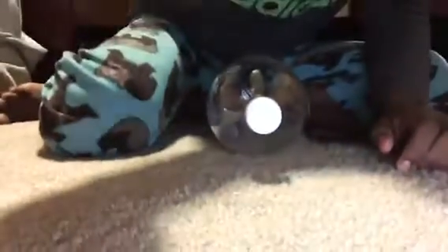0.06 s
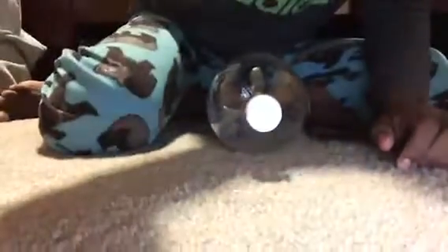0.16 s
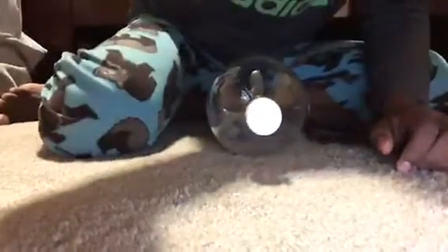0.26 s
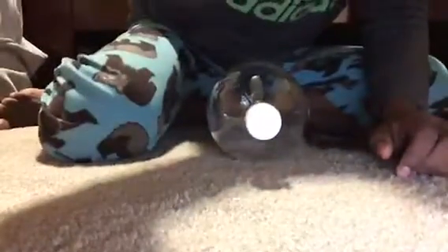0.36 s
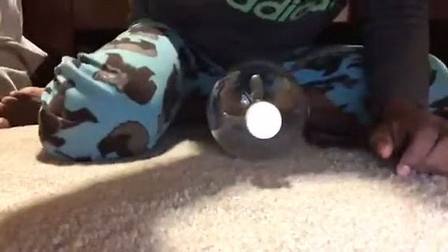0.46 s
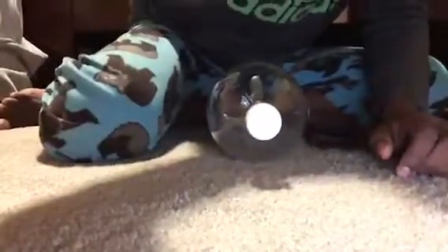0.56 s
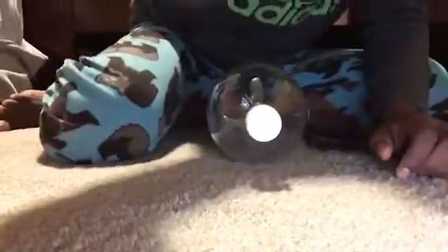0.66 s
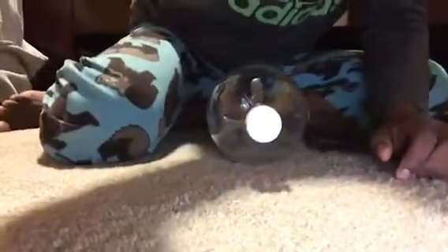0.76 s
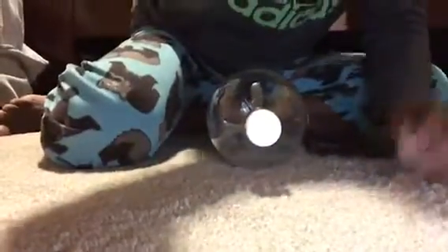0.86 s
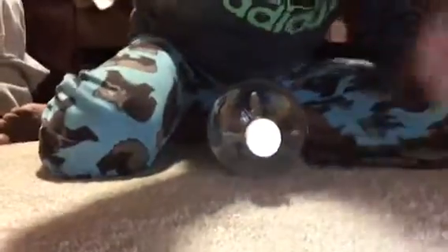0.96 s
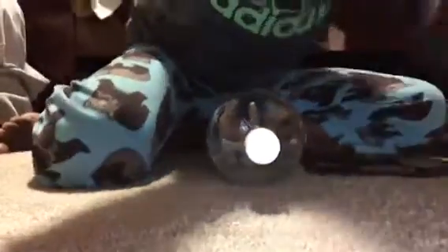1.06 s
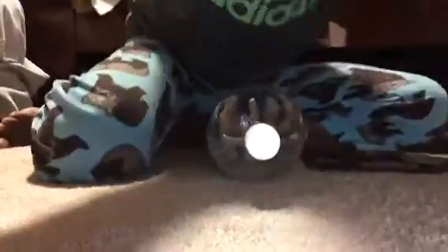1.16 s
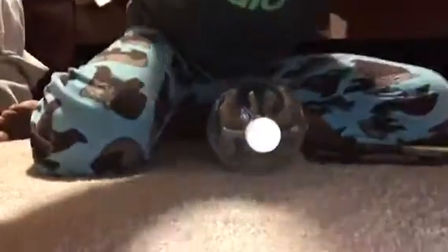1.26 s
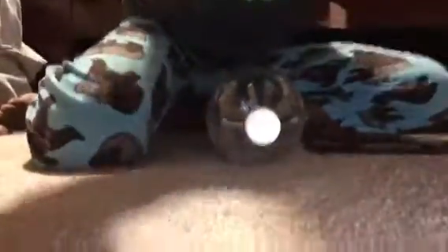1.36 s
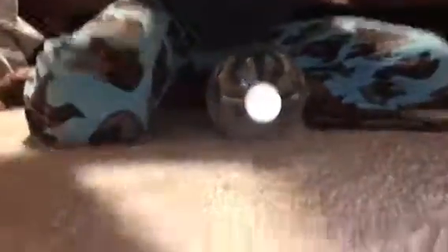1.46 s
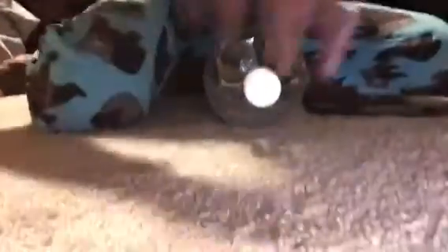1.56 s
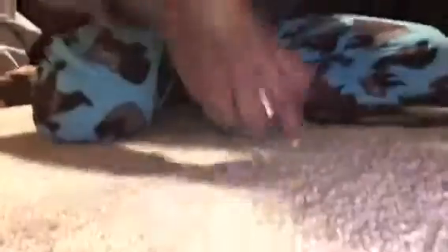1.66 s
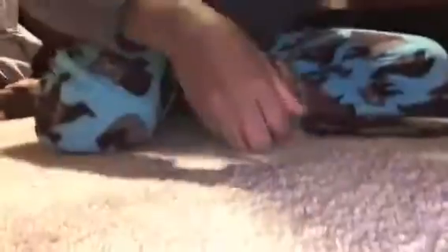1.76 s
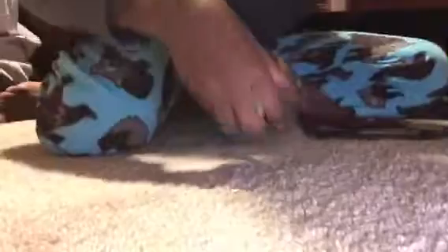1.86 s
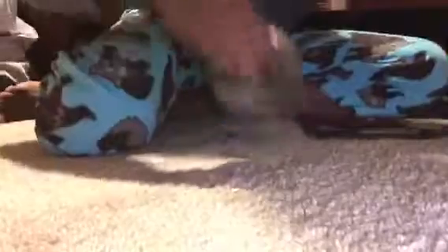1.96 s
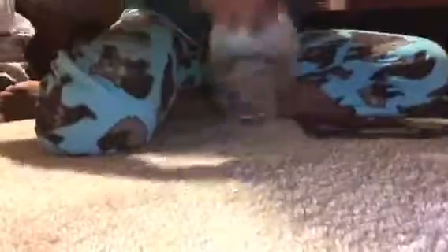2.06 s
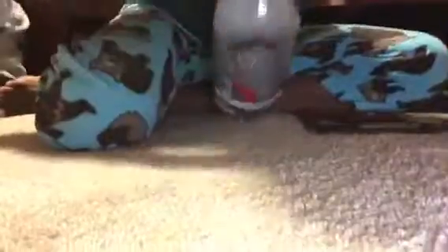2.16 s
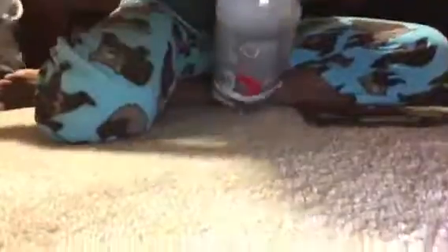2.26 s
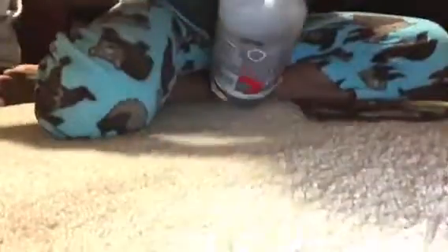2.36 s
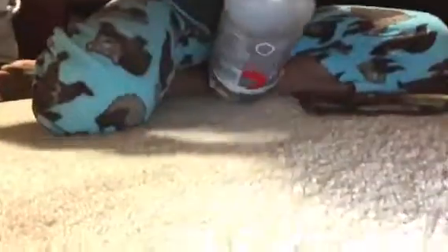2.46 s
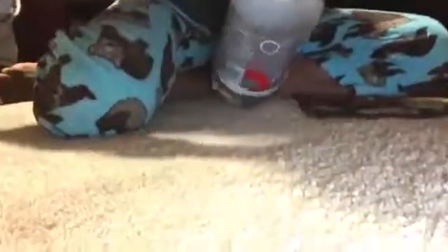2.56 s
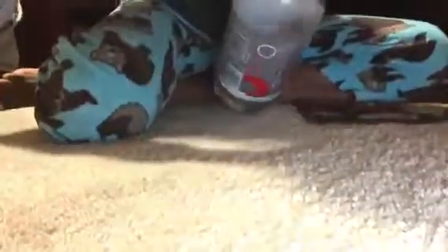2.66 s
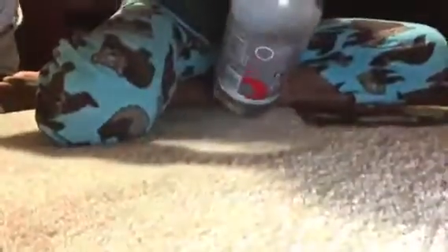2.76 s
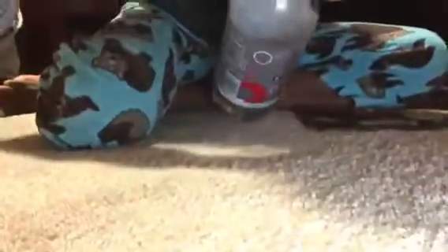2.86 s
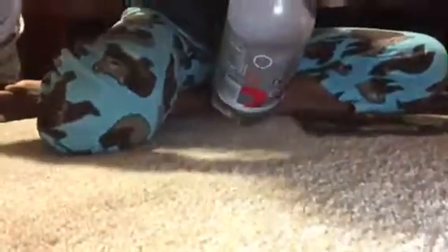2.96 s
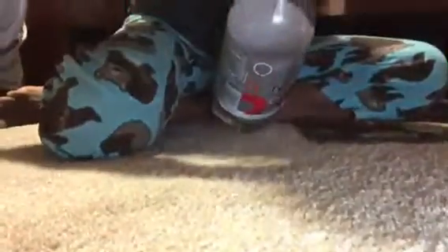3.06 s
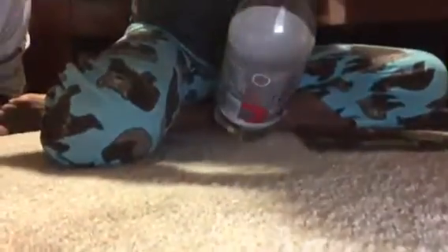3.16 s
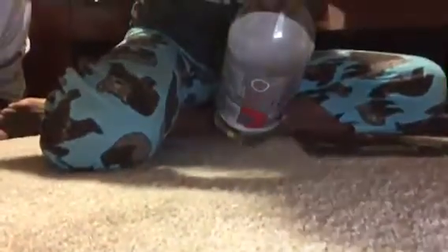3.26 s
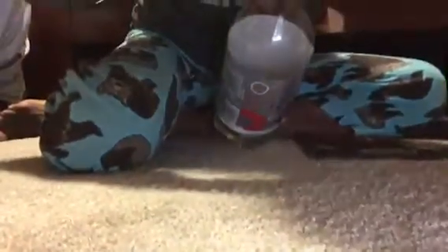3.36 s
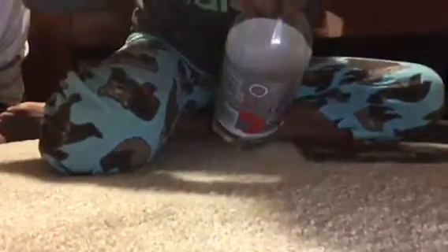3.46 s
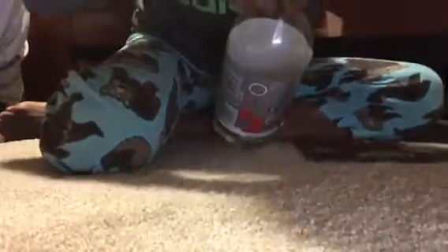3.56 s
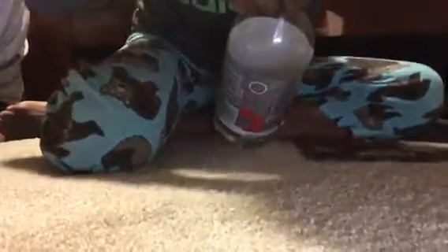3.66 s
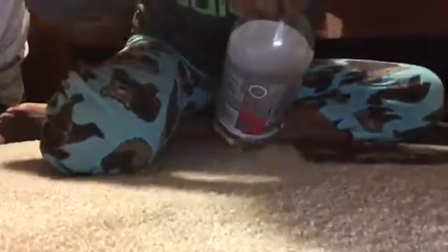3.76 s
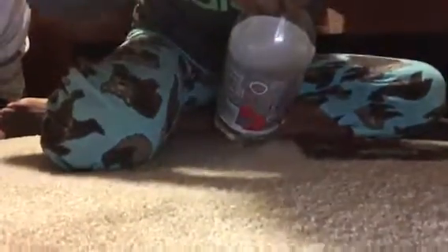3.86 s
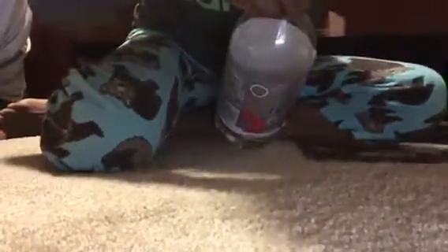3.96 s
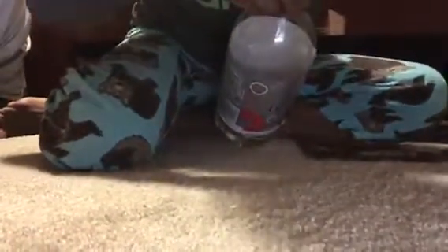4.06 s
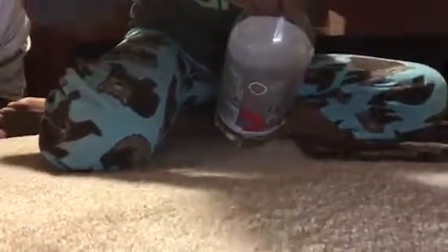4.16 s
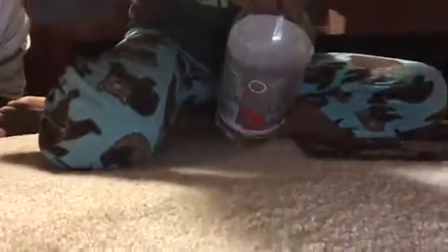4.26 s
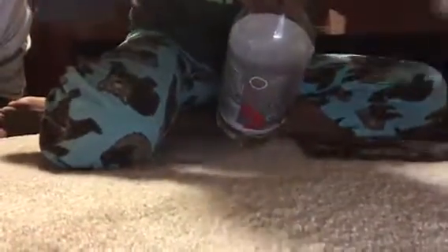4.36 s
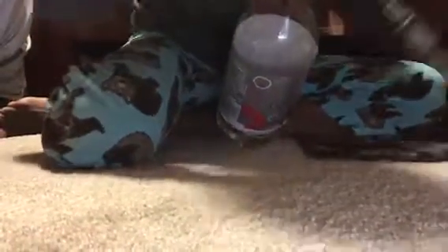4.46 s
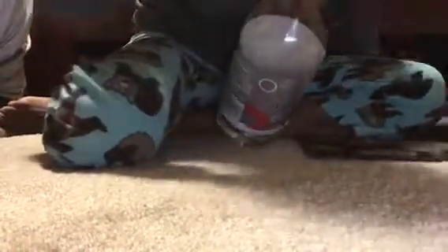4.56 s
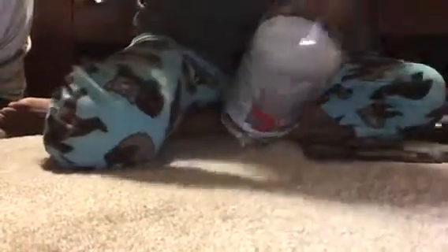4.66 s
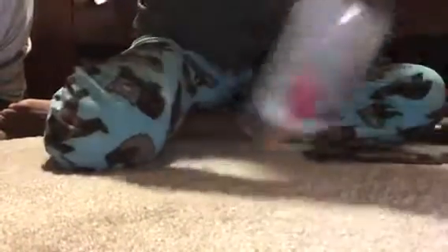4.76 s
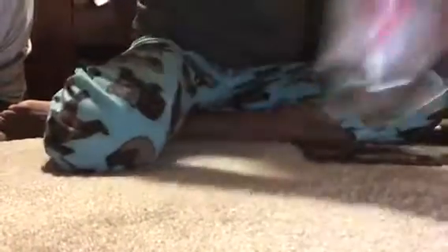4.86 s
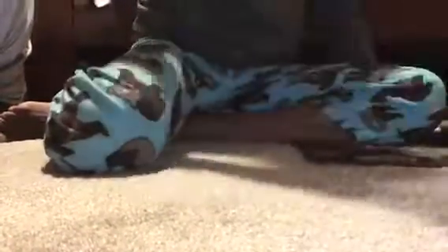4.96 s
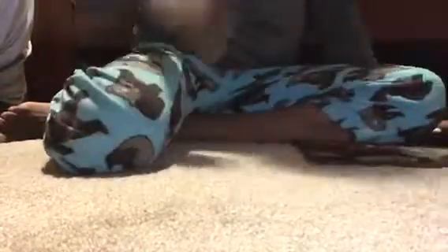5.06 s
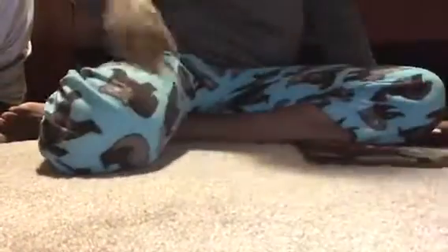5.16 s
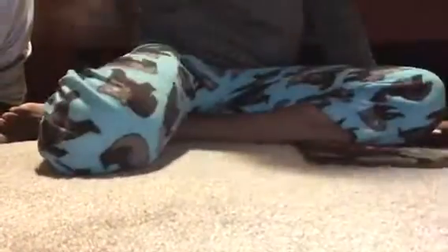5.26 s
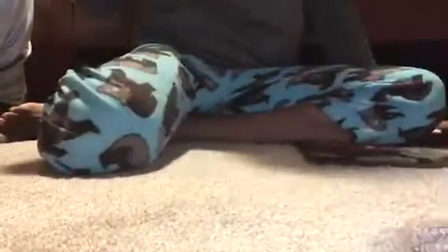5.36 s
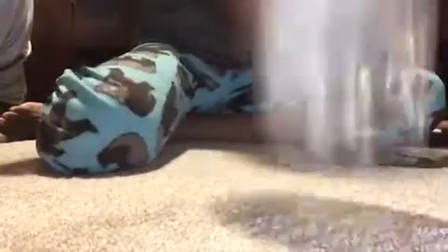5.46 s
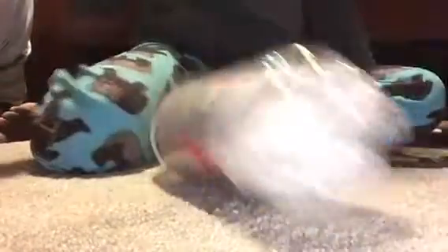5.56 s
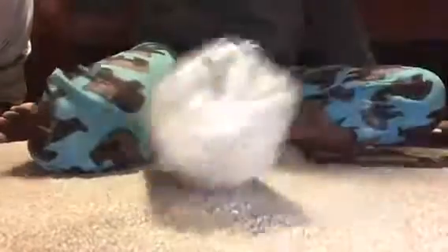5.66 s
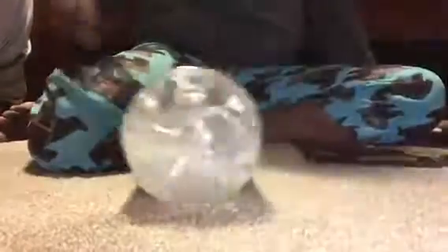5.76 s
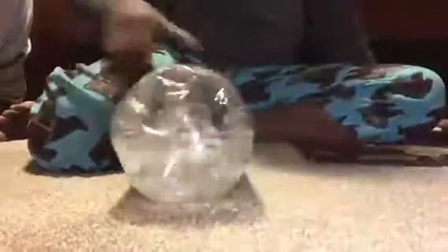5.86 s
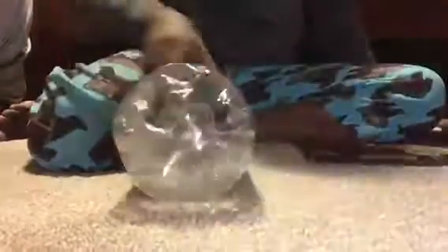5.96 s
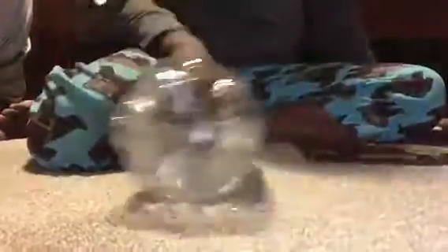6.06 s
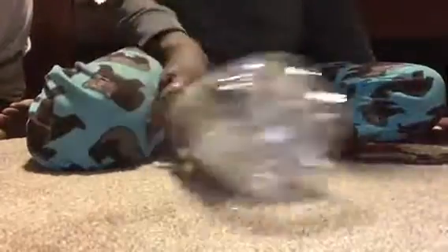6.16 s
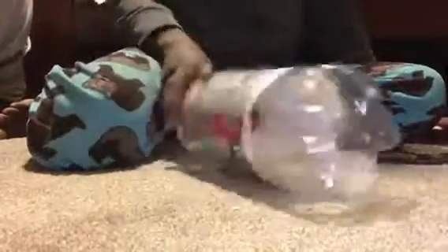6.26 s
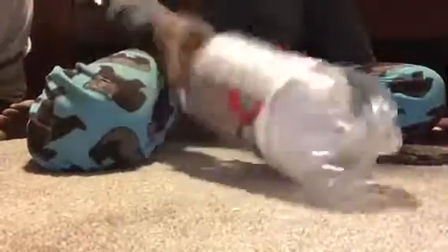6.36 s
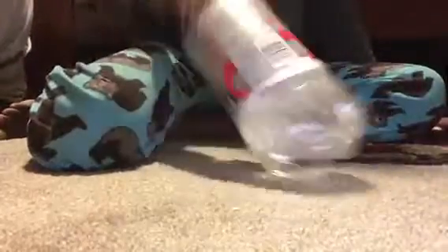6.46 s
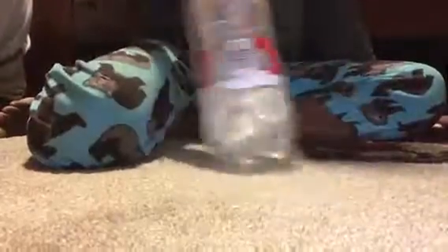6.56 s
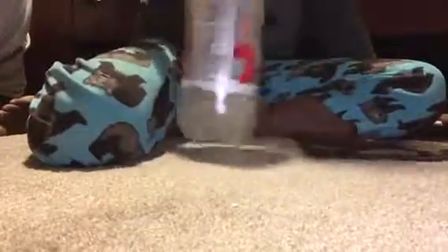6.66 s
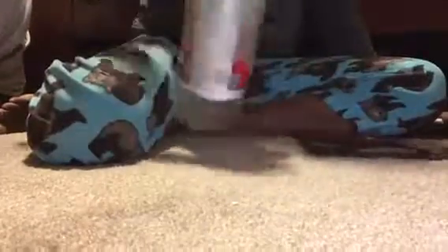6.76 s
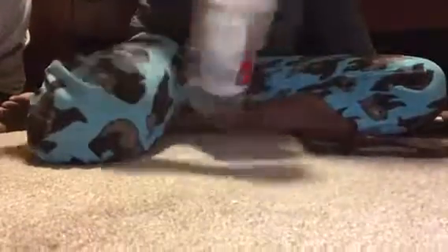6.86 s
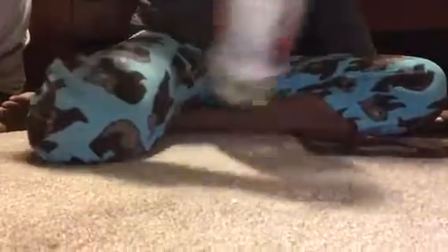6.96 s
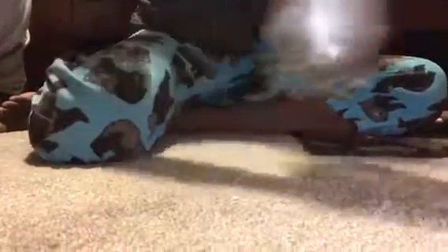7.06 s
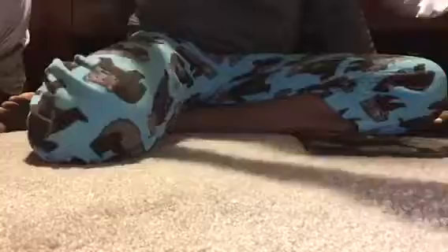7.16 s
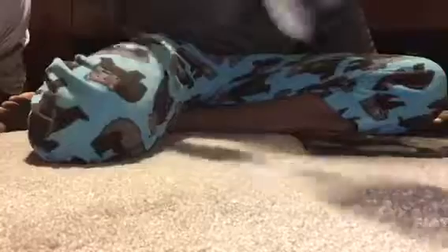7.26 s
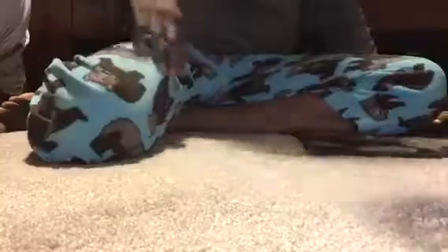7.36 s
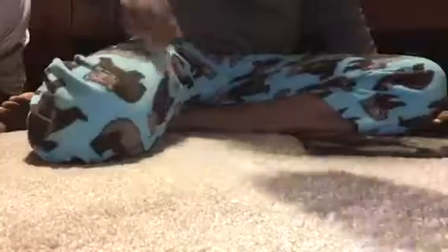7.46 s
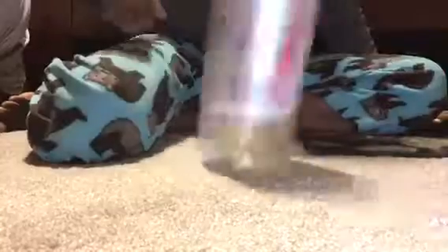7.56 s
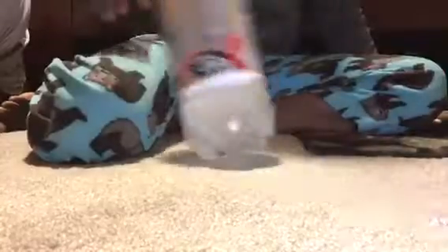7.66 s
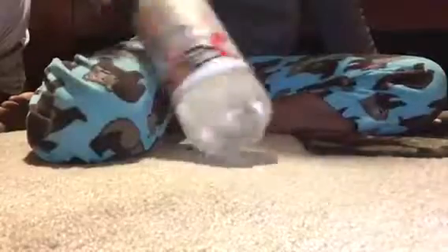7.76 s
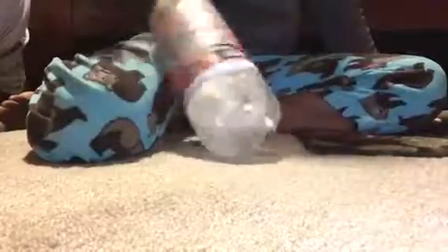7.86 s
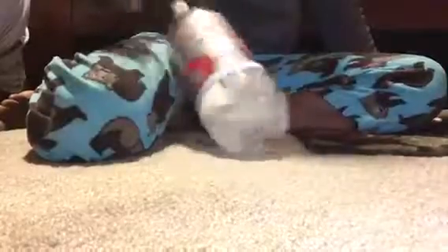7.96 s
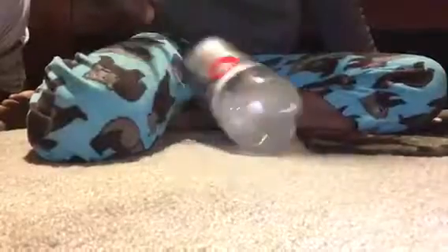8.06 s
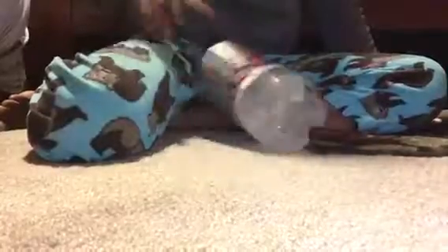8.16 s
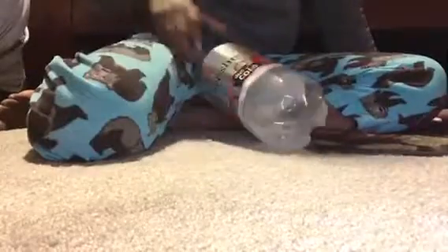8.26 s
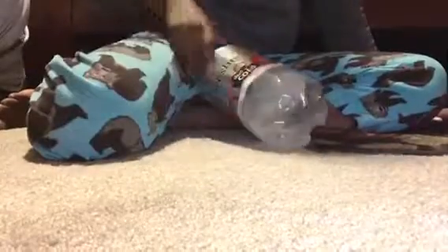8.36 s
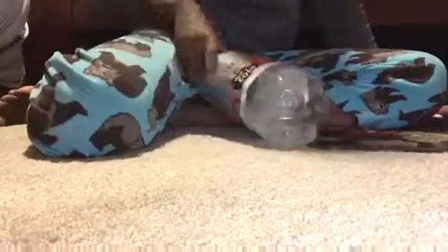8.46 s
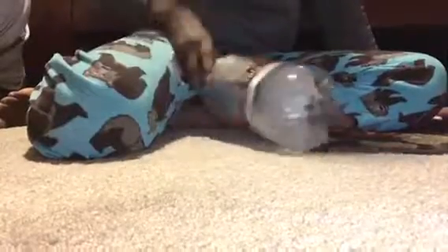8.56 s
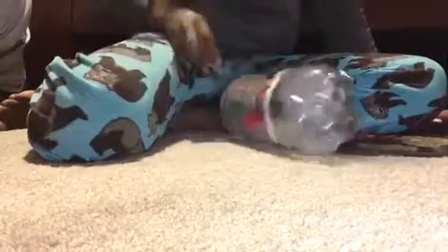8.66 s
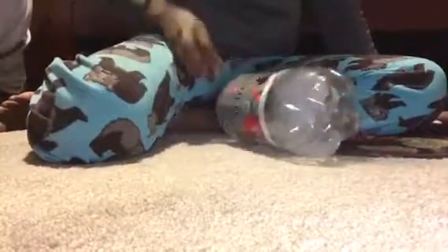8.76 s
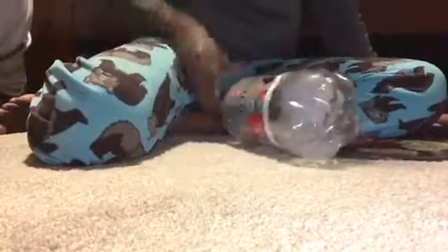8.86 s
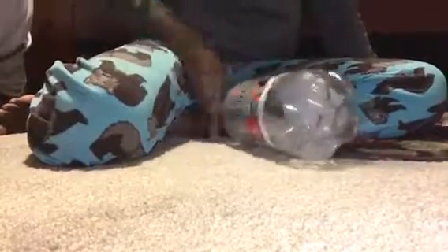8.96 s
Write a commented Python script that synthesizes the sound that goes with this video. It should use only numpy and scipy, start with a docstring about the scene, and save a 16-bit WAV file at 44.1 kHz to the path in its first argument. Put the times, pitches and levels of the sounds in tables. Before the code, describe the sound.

A partly filled large plastic bottle is handled, then flipped twice onto carpet, landing with deep thuds, crackly plastic ringing and sloshing water, amid close rustling.

```python
"""Close to the microphone, clothes, hands and carpet pile rustle and tick as a bottle is picked up and swung.
It is a large plastic bottle with some water in it, flipped twice onto the carpeted floor of a small room.
Each landing pushes decaying floorboard modes and buckles the thin shell into ringing; the water sloshes after
it as swarms of bubbles, drops and gulps. Rustle is coloured random clicks, ticks are damped snaps.
The phone lies on the carpet; faint noise of the room air and a short diffuse echo surround everything."""
import sys
import numpy as np
from scipy import signal
from scipy.fft import rfft, irfft
from scipy.io import wavfile

SR = 44100
rng = np.random.default_rng(int(sys.argv[2]) if len(sys.argv) > 2 else 0)


def generate_wav(sig):
    """Save sig (samples, or channels by samples) to the path in sys.argv[1] as 16-bit PCM at SR."""
    pcm = np.round(np.clip(np.atleast_2d(sig).T, -1, 1) * 32767).astype(np.int16)
    wavfile.write(sys.argv[1], SR, pcm)


N = 396900
TIME = np.arange(N) / SR  # s

# Colour of the room air. Each row: frequency in Hz, relative density in dB per Hz.
AIR_COLOUR = [(25, -19), (70, 6), (130, 3.5), (236, 0.5), (489, -12.5), (700, -6), (900, -18), (1400, -11),
              (2300, -17), (6000, -20.5), (10500, -25.5), (15500, -26.5)]
# Reverberation of the small room. Each row: frequency in Hz, time to fall by 60 dB in s.
ROOM_DECAY = [(100, 0.29), (700, 0.34), (3000, 0.32), (12000, 0.11)]
# Strokes of hand, clothes and bottle over each other and the carpet.
# Each row: start in s, length in s, crackle in dB (before its layer gain), soft brushing in dB.
RUB_STROKES = [(.04, 0.056, -74, -62), (.21, 0.063, -107, -72), (.41, 0.12, -67, -67.5),
               (.75, 0.099, -64, -63.5), (.98, 0.13, -57.5, -57), (1.11, .055, -60.5, -63),
               (1.025, 0.04, -56, -52), (1.25, 0.29, -62.5, -61.5), (1.425, 0.039, -64, -47.5),
               (1.56, 0.089, -68.5, -60), (1.8, 0.076, -69, -55.5), (1.89, 0.092, -84, -69),
               (2.02, .15, -87, -69.5), (2.04, 0.032, -65, -58.5), (2.52, 0.04, -61, -52),
               (3.05, 0.02, -92, -54), (3.105, 0.19, -67, -52.5), (3.19, .07, -58, -67),
               (3.27, 0.09, -63.5, -59.5), (3.35, 0.3, -62, -62), (3.45, 0.032, -60, -45),
               (3.53, 0.071, -64, -74), (3.915, 0.13, -55, -58.5), (3.98, 0.036, -55, -51.5),
               (4.06, 0.47, -80.5, -100), (4.635, 0.069, -82, -65.5), (4.8, 0.061, -81, -68),
               (8.47, 0.088, -67, -64), (8.52, 0.043, -68, -58), (8.85, 0.045, -59, -60),
               (8.92, 0.1, -68.5, -72)]
# Colour of the dull brushing. Each row: frequency in Hz, relative density in dB per Hz.
BRUSH_COLOUR = [(60, -12), (160, 3.5), (450, 1), (1500, -2.5), (3000, -6.5), (6000, -15.5), (11000, -36.5),
                (15500, -17.5)]
# Colour of the bright crackle. Each row: frequency in Hz, relative density in dB per Hz.
CRACKLE_COLOUR = [(300, -13), (1500, -5), (4500, 3.5), (7000, 1), (11000, -2.5), (15500, 0.5)]
# The clearest dry ticks of plastic and fabric.
# Each row: time in s, energy in dB, frequency in Hz that places the band of the snap.
CLEAR_TICKS = [(.396, -29, 6500), (.485, -26, 1980), (.578, -33, 3700), (.869, -26.5, 12200),
               (1.0208, -22, 4400), (1.0448, -22, 2900), (1.072, -11.5, 2560), (1.2713, -24.5, 3450),
               (1.3023, -22.5, 3300), (1.3445, -25, 2300), (2.0287, -31, 2280), (2.0478, -21, 2600),
               (2.5427, -22, 2600), (2.5566, -20, 2600), (2.704, -35.5, 4700), (3.0004, -32, 3170),
               (3.2186, -21, 3300), (3.2453, -13.5, 1950), (3.2941, -24.5, 3730), (3.3771, -20, 2250),
               (3.4576, -12, 2540), (3.543, -23.5, 4700), (3.5547, -18.5, 2800), (3.5821, -22, 2300),
               (3.8355, -14.5, 3330), (3.8863, -21, 7560), (3.9603, -21, 11500), (4.0071, -24, 3020),
               (4.023, -23.5, 7300), (4.168, -32.5, 5300), (5.0625, -30.5, 6300), (5.1662, -27.5, 9500),
               (6.366, -33, 12000), (6.8766, -29, 8600), (7.036, -32, 7570), (7.691, -25, 12000),
               (7.895, -37.5, 8000), (8.02, -29, 4930), (8.122, -30, 11000), (8.475, -30, 9000),
               (8.489, -29.5, 10800), (8.5486, -9, 8140), (8.8858, -22.5, 9420), (8.9787, -27, 4600)]
# Soft blows on the floor from the bottle, knees and hands.
# Each row: start in s, peak in dB before the high-pass, time scale of the contact in ms,
# gain of the lowest floor mode in dB.
FLOOR_BLOWS = [(0.241, -47.5, 2, 2), (0.274, -51, 3, -2), (1.36, -28.5, 1.6, -2), (1.402, -40, 3, -6),
               (1.431, -23, 4.1, -11), (1.808, -36.5, 0.62, -16), (2.325, -54, 7.6, 11),
               (2.965, -43.5, 3.2, -4), (3.115, -38, 5.4, -10), (3.458, -33.5, 1.8, -24),
               (3.982, -44.5, 6.2, -1), (4.643, -39.5, 1.6, 5.5), (5.109, -34, 1.9, -2),
               (5.608, -7, 2.05, 2.5), (5.682, -21.5, 2.4, 2.5), (6.146, -32, 1, -6),
               (7.341, -32, 0.77, -4), (7.6848, -8, 2.03, 5), (7.824, -38.5, 0.57, -11.5),
               (8.484, -42.5, 0.57, -12.5), (8.771, -32.5, 2.2, 3.5)]
# Floorboards under the carpet, lowest first. Each row: frequency in Hz, relative level in dB, t60 in s.
BOARD_MODES = [(72.5, -1.5, .165), (166, -3, 0.11), (233.6, 4, 0.078), (298, 2.5, 0.054), (386, -8.5, 0.12),
               (466, -7, 0.053)]
# Waves of water breaking against the bottle wall.
# Each row: crest in s, swell in s, settling in s, gurgle in dB (before its layer gain), spray in dB.
WATER_WAVES = [(2.45, 0.089, 0.17, -54, -61.5), (2.54, 0.13, 0.036, -47.5, -53),
               (2.61, 0.015, 0.22, -60, -70), (4.9, 0.051, 0.034, -60.5, -87),
               (5.098, 0.039, 0.039, -39.5, -43.5), (5.315, 0.033, 0.14, -47.5, -45.5),
               (5.625, .012, 0.1, -53, -33.5), (5.68, 0.063, 0.046, -29.5, -43),
               (5.8, 0.1, 0.34, -56, -58.5), (5.885, .12, 0.061, -54.5, -58),
               (6.38, 0.017, 0.063, -50.5, -50), (6.446, .015, 0.063, -45.5, -51.5),
               (6.49, 0.064, 0.033, -58, -53), (6.61, 0.14, 0.28, -53.5, -58.5),
               (6.67, 0.058, 0.089, -52, -58.5), (6.74, 0.15, 0.099, -48, -55),
               (6.85, 0.11, 0.12, -59, -68), (7.305, .04, 0.093, -50.5, -61.5),
               (7.338, 0.017, 0.02, -46.5, -47.5), (7.58, 0.017, 0.069, -53, -43.5),
               (7.62, 0.036, 0.041, -66, -48), (7.71, 0.056, 0.1, -38.5, -44.5),
               (7.765, 0.11, 0.18, -51.5, -53.5), (7.9, 0.28, .4, -55.5, -68),
               (8.05, 0.18, 0.18, -53.5, -61.5)]
# Colour of the splashing drops. Each row: frequency in Hz, relative density in dB per Hz.
SPRAY_COLOUR = [(500, 0), (2000, 5.5), (3300, 1), (5500, -1.5), (7500, -5.5), (11000, -8), (15500, -18.5)]
# Air pockets gulping through the water. Each row: start in s, energy in dB, starting pitch in Hz, t60 in s.
GULPS = [(2.462, -29, 785, 0.054), (2.496, -22, 1340, 0.037), (2.516, -28, 1200, 0.036),
         (2.6, -32, 1400, .07), (4.634, -12.5, 221, 0.067), (6.385, -19.5, 654, 0.075),
         (6.478, -19.5, 368, 0.088), (6.5, -22, 745, 0.033), (6.661, -15.5, 277, 0.11),
         (6.732, -14, 205, 0.17), (6.734, -17, 872, 0.036), (8.033, -23.5, 480, 0.025),
         (8.054, -21.5, 600, 0.024), (8.112, -20.5, 890, 0.015), (8.785, -18.5, 616, 0.05)]
# Knocks that flex the bottle wall.
# Each row: start in s, energy in dB, low-pass corner of the force in Hz, decay constant of the crumpling in ms.
WALL_KNOCKS = [(0.043, -31, 870, 3.6), (1.302, -19.5, 1490, .86), (1.354, -19.5, 1300, 6.1),
               (1.43, -17.5, 420, 2.4), (1.805, -33, 870, 2.3), (2.932, -31.5, 5400, 6.1),
               (4.367, -29.5, 2980, 0.91), (5.091, -12, 6200, 3.6), (5.11, -11, 3870, 3.2),
               (5.311, -14, 7400, 5.4), (5.6043, 2.5, 700, 1.5), (5.6071, 1, 5300, 4),
               (5.613, 6.5, 4370, 2.7), (5.6151, 4, 8100, 3.4), (5.622, 8, 610, 22),
               (5.657, -7.5, 1520, 11), (6.147, -13, 714, 6), (6.374, -17.5, 2440, 1.4),
               (6.4422, -15, 8900, 2.8), (6.478, -18, 1100, 2.1), (6.486, -18, 2630, 2.9),
               (6.659, -19, 1480, 4), (6.733, -20, 1184, 6.7), (7.338, -15.5, 2540, 3.4),
               (7.6792, -5, 1000, 3.6), (7.71, -29, 4000, 6.6), (7.826, -20, 913, 3.5),
               (8.112, -21, 1380, 3.5), (8.783, -26, 1302, 4.7), (8.978, -27, 2470, 1.8)]
# Bottle wall and the air inside, ringing freely. Each row: nominal frequency in Hz, energy in dB, t60 in s.
WALL_MODES = [(336.3, -3, 0.071), (500, -7.5, 0.015), (624, -9.5, 0.16), (1016, -14, 0.092),
              (1144, -7, 0.15), (1182, -4, 0.15), (1478, -3.5, 0.07), (1612, -3, .08), (1850, -7.5, 0.055),
              (2270, -13.5, 0.12), (2450, -16.5, 0.15), (2720, -10.5, .12), (2987, -14, 0.073),
              (3640, -13, .1), (4060, -16, 0.093), (4470, -7.5, 0.05), (5340, -3.5, 0.041),
              (5800, -15, 0.061)]

AIR_DB = -66
STROKE_ATTACK_S, STROKE_RELEASE_S = 0.0069, 0.021  # a stroke takes hold quickly and fades with this time constant
STROKE_ARCH_DB = 2  # it presses this much harder halfway than at its ends
WAVE_RANGE_DB = 21.5  # a wave gains this much over its swell and loses it again while settling
RING_SHARE = 0.54  # share of its free ring time that the wall keeps at 0 dB
RING_GROWTH = 0.4  # exponent of that share's growth with the force
TOP_HZ = 16000


def undb(db):
    """Decibels to gain."""
    return 10 ** (np.asarray(db) / 20)


def unit(x):
    """Scale to energy 1."""
    return x / np.sqrt(np.sum(x ** 2) + 1e-18)


def steady(x):
    """Scale to rms 1."""
    return unit(x) * np.sqrt(len(x))


def add(out, s, x):
    """Mix x into out from time s."""
    i = int(np.clip(round(s * SR), 0, N - 1))
    out[i:i + len(x)] += x[:N - i]


def at_hz(hz, points):
    """Read (Hz, value) points on a log-frequency axis."""
    f, value = np.transpose(points)
    return np.interp(np.log(hz + 1), np.log(f), value)


def colour(x, points):
    """Give x a spectrum, at rms 1."""
    gain = undb(at_hz(np.fft.rfftfreq(len(x), 1 / SR), points))
    return steady(irfft(rfft(x) * gain, len(x)))


def butter(x, hz, kind, order=2):
    """Causal low-, high- or band-pass."""
    sos = signal.butter(order, np.clip(hz, 10, SR / 2.1), kind, fs=SR, output="sos")
    return signal.sosfilt(sos, x)


def ring(t, hz, t60):
    """One decaying mode."""
    return np.sin(2 * np.pi * hz * t) * np.exp(-np.log(1000) * t / t60)


def grains(per_s, spread_db):
    """Random clicks, a few of them much larger than the rest."""
    hit = rng.random(N) < per_s / SR
    size_db = spread_db * np.minimum(rng.exponential(size=N), 4)
    return hit * rng.choice([-1, 1], N) * undb(size_db)


def flutter(per_s, size):
    """Smooth random unevenness with about per_s turns a second, spread 1."""
    knots = rng.standard_normal(int(size * per_s / SR) + 2)
    return np.interp(np.arange(size) * per_s / SR, np.arange(len(knots)), knots) * np.sqrt(3 / 2)


def gains(events, envelope):
    """Gains of the two layers whose dB end each row; overlapping events add in power."""
    power = np.zeros((2, N))
    for *timing, first_db, second_db in events:
        power += np.outer(undb([first_db, second_db]), envelope(*timing)) ** 2
    return np.sqrt(power)


def room_air():
    """Steady noise of the air in the room, strongest in the bass."""
    return undb(AIR_DB) * colour(rng.standard_normal(N), AIR_COLOUR)


def room(x, build_s=0.024):
    """Diffuse echo of a small furnished room, each octave dying at its own rate."""
    t = np.arange(SR * 2 // 3) / SR
    tail = 0
    for hz in 62.5 * 2 ** np.arange(9):
        band = butter(rng.standard_normal(len(t)), [hz / np.sqrt(2), hz * np.sqrt(2)], "bandpass")
        tail = tail + band * np.exp(-np.log(1000) * t / at_hz(hz, ROOM_DECAY))
    build_up = 1 - np.exp(-t / build_s)
    return signal.fftconvolve(x, unit(tail * build_up))[:N]


def stroke(start_s, length_s):
    """Envelope of a rub: attack, an arch of pressure while it slides, release."""
    age = TIME - start_s
    arch = np.sin(np.pi * np.clip(age / length_s, 0, 1)) - 2 / np.pi  # averages to zero over the slide
    attack = np.clip(age / STROKE_ATTACK_S, 0, 1)
    release = np.exp(-np.clip((age - length_s) / STROKE_RELEASE_S, 0, 20))
    return undb(STROKE_ARCH_DB * arch) * attack * release


def rustle(crackle_db=2, grip_db=3, stray_db=-73):
    """Fibres catch and let go in small jerks: bright crackle over dull brushing, and stray ticks between moves."""
    crackle, brush = gains(RUB_STROKES, stroke)
    grip = undb(grip_db * flutter(70, N))
    bright = colour(grains(per_s=2500, spread_db=5), CRACKLE_COLOUR)
    dull = colour(grains(per_s=2500, spread_db=4.2), BRUSH_COLOUR)
    stray = butter(colour(grains(per_s=50, spread_db=4.5), CRACKLE_COLOUR), 4000, "highpass")
    rubbing = undb(crackle_db) * crackle * bright + brush * dull
    return grip * rubbing + undb(stray_db) * stray


def tick(hz, edge_db=-11, tail_db=-11, tail_s=0.0023):
    """A single snap, one heavily damped swing with a sharp edge; energy 1."""
    t = np.arange(SR // 40) / SR
    tail = unit(rng.standard_normal(len(t)) * np.exp(-t / tail_s))
    force = signal.unit_impulse(len(t)) + undb(tail_db) * tail
    body = unit(butter(force, [hz * 0.4, hz * 1.46], "bandpass", order=1))
    edge = unit(butter(force, [12000, 16000], "bandpass", order=1))
    return unit(body + undb(edge_db) * edge)


def ticks(snag_db=26, stray_db=-44, spread_db=11, low_hz=4500, high_hz=14000, count=70):
    """The clear ticks, and small snags at random moments: faint between moves, stronger under a rub."""
    out = np.zeros(N)
    for s, db, hz in CLEAR_TICKS:
        add(out, s, undb(db) * tick(hz))
    crackle, _ = gains(RUB_STROKES, stroke)
    for when, size, where in rng.random((count, 3)):
        strength = undb(stray_db) + undb(snag_db) * crackle[int(when * N)]
        hz = low_hz * (high_hz / low_hz) ** where
        add(out, when * N / SR, strength * undb(spread_db * size) * tick(hz))
    return out


def thuds():
    """The carpet spreads each blow into a smooth push; a longer push leaves only the lowest floor modes."""
    out, t = np.zeros(N), np.arange(SR // 2) / SR
    lowest, *upper = (undb(db) * ring(t, hz, t60) for hz, db, t60 in BOARD_MODES)
    for s, db, contact_ms, deep_db in FLOOR_BLOWS:
        boards = undb(deep_db) * lowest - sum(upper)  # under the phone the upper modes swing against the lowest
        age = t * 1000 / contact_ms
        push = age * np.exp(-np.pi * age ** 2)
        thud = signal.fftconvolve(boards, push)[:len(t)]
        add(out, s, undb(db) * thud / np.abs(thud).max())
    return butter(out, 42, "highpass")


def wave(crest_s, swell_s, settling_s):
    """Envelope of a wave: it swells to its crest and settles, both evenly in dB."""
    away = np.maximum((crest_s - TIME) / swell_s, (TIME - crest_s) / settling_s)
    return undb(-WAVE_RANGE_DB * np.minimum(away, 10))


def bubble(hz, t60, rise=0.061):
    """Trapped air rings and climbs in pitch as it nears the surface; energy 1."""
    t = np.arange(int(t60 * SR) + 2) / SR
    # rise acts on the phase, so the heard pitch climbs by twice that share
    note = ring(t, hz * (1 + rise * t / t60), t60)
    return unit(note * (1 - np.exp(-hz * t)))


def bubble_swarm(low_hz=260, high_hz=4500, knee_hz=1900, cycles=8, count=8000):
    """Folding water traps a swarm of short bubbles of many sizes; rms 1."""
    swarm = np.zeros(N)
    for when, where, size, life in rng.random((count, 4)):
        hz = low_hz * (high_hz / low_hz) ** where
        t60 = cycles * (1 + 2 * life) / hz
        add(swarm, when * N / SR, undb(12 * size ** 2) * bubble(hz, t60))
    return steady(butter(swarm, [220, knee_hz], "bandpass"))  # the wall muffles the smallest bubbles


def droplets(low_hz=2000, high_hz=7000, cycles=45, spread_db=22, count=4000):
    """Small drops fall back and each rings a tiny bubble; rms 1."""
    out = np.zeros(N)
    for when, where, size in rng.random((count, 3)):
        hz = low_hz * (high_hz / low_hz) ** where
        add(out, when * N / SR, undb(spread_db * size ** 3) * bubble(hz, cycles / hz))
    return steady(out)


def gulps(churn=1.0):
    """Big air pockets ring through the water; it tears them about, so their note is rough."""
    out = np.zeros(N)
    for s, db, hz, t60 in GULPS:
        gulp = bubble(hz, t60)
        rough = gulp * (1 + churn * flutter(hz / 2, len(gulp)))
        add(out, s, undb(db) * unit(rough))
    return out


def water(gurgle_db=-1, splash_db=-1, droplet_db=-5):
    """Waves bring up the bubble swarm, throw drops against the wall and now and then the water gulps."""
    gurgle, spray = gains(WATER_WAVES, wave)
    splash = colour(grains(per_s=3200, spread_db=4.5), SPRAY_COLOUR)
    drops = undb(splash_db) * splash + undb(droplet_db) * droplets()
    return undb(gurgle_db) * gurgle * bubble_swarm() + spray * drops + gulps()


def knocks(crack_db=7, detune=0.03, leak_db=-24):
    """The wall gives way in a quick run of tiny buckles, which crack and set the shell ringing."""
    out, t = np.zeros(N), np.arange(SR // 4) / SR
    snap = signal.unit_impulse(len(t))
    crack = unit(butter(snap, [200, 6500], "bandpass", order=1))
    for s, db, bright_hz, crumple_ms in WALL_KNOCKS:
        # hand and carpet choke a light knock; a hard one rings on
        free = min(RING_SHARE * undb(db) ** RING_GROWTH, 1)
        # the shifting water loads the wall differently at every knock
        load = 1 + detune * rng.uniform(-1, 1, len(WALL_MODES))
        shell = np.zeros(len(t))
        for k, (hz, mode_db, t60) in enumerate(WALL_MODES):
            shell += (-1) ** k * undb(mode_db) * unit(ring(t, hz * load[k], t60 * free))
        buckles = rng.standard_normal(len(t)) ** 3 * np.exp(-t * 1000 / crumple_ms)
        force = snap + unit(buckles)
        dull_force = butter(force, bright_hz, "lowpass", order=4)
        treble_leak = butter(force, bright_hz, "lowpass", order=1)  # the gentler slope lets some treble through
        force = dull_force + undb(leak_db) * treble_leak
        knock = signal.fftconvolve(shell + undb(crack_db) * crack, force)[:len(t)]
        add(out, s, undb(db) * unit(knock))
    return out


def scene():
    """The bottle sounds out into the room; the rustle is close and nearly dry."""
    air, close, floor, slosh, shell = room_air(), ticks() + rustle(), thuds(), water(), knocks()
    echo = room(undb(-22) * floor + undb(-23) * shell + undb(-20.5) * slosh + undb(-28) * close)
    return (floor + shell + slosh + close + echo + air)[None]


def record(dry):
    """The phone cuts the top with a steep low-pass."""
    return signal.sosfilt(signal.ellip(8, .2, 70, TOP_HZ, fs=SR, output="sos"), dry)


dry = scene()
out = record(dry)
generate_wav(out)
```